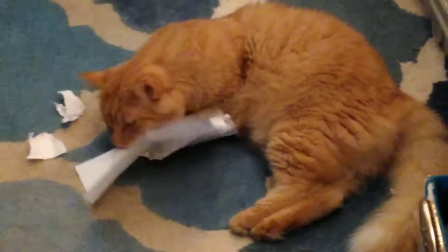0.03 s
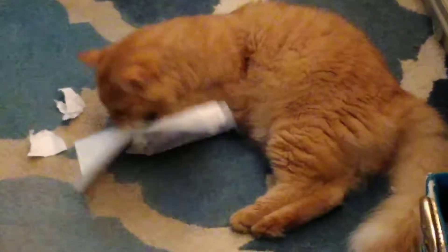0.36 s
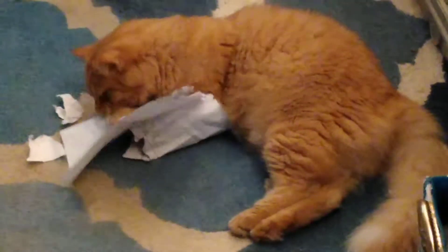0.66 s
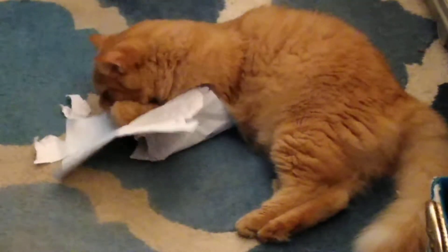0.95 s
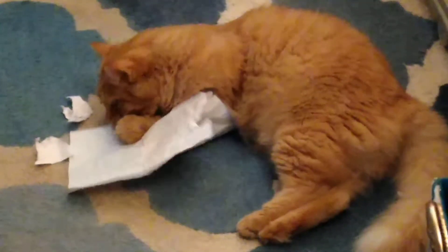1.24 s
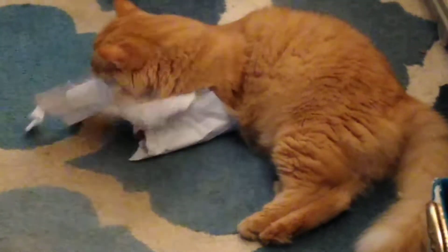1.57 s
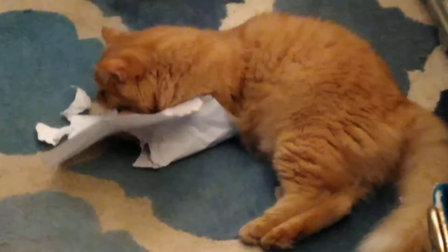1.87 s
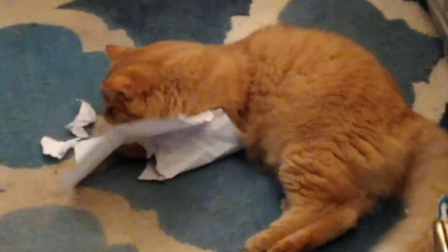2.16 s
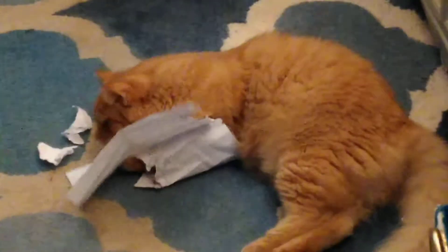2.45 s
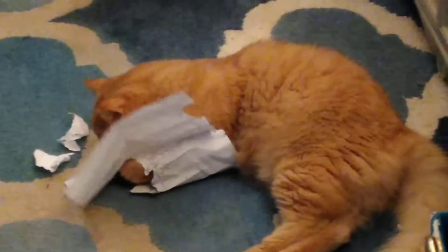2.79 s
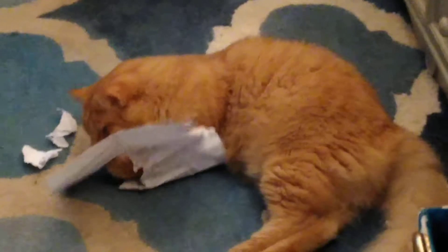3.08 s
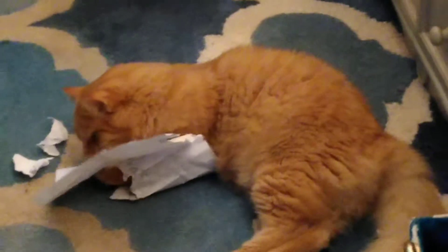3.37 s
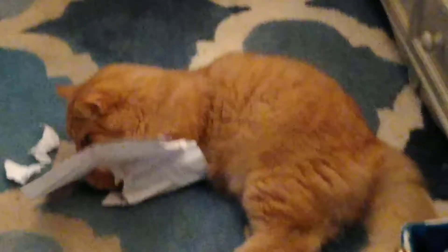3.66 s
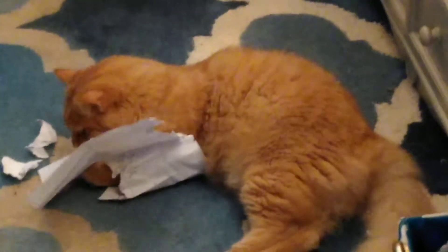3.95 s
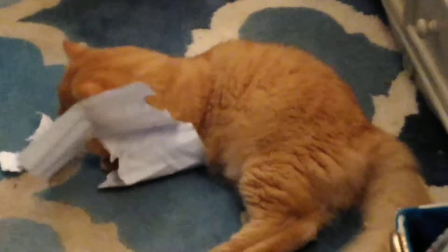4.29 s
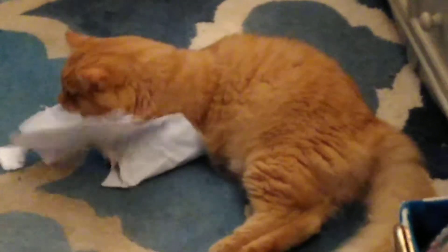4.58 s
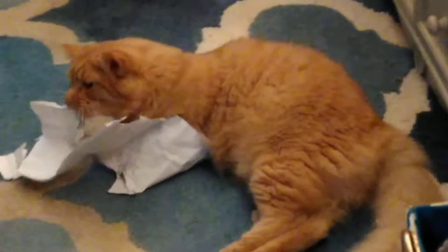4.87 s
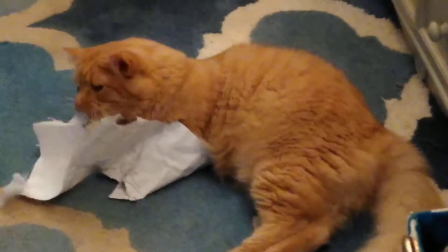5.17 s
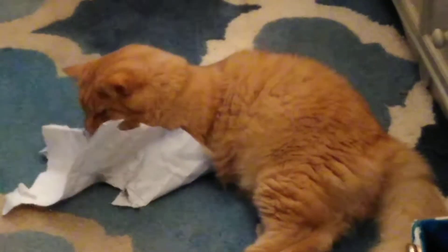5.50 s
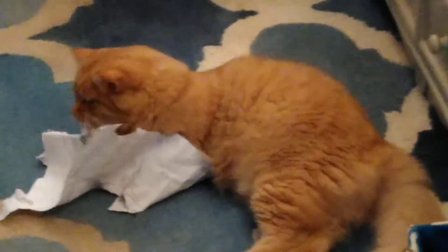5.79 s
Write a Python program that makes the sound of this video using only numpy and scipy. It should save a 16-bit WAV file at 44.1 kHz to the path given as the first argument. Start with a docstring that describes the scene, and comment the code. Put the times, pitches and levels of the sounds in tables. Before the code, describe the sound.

A cat tugs at a sheet of paper in a small, quiet room with faint air noise and a low hum. Soft rustling starts around 0.3 seconds, with a sharp crease snap at 0.7 and smaller crackles just after. The strongest flurry of crisp rustles and snaps runs from 1.4 to 1.8 seconds, followed by another snap near 2. Faint sliding lasts until about 2.6, then a lull, with one dull paper tick at 3.2. From 3.4 to 3.7 seconds the hand holding the phone makes close, muffled knocks and a small scuff, mostly on the left. The paper rustles again from 4.6 to 5 seconds. The loudest sound, a sharp handling pop, comes on the right just before 5.2, with a smaller one at 5.3, a cluster of knocks on the left at 5.6 and a last bump near 6, as a low grip rumble grows.

```python
"""A cat dragging paper

In a small, quiet room a cat on a rug bites and drags a sheet of paper. The sheet rustles with
each tug, rings as it slides and snaps where a crease flips over. The hand holding the phone
shifts: the grip rumbles, a fingertip scuffs and the case pops beside one of the two microphones.
The phone widens its stereo by subtracting a delayed copy of each mic from the other."""
import sys
import numpy as np
from scipy import signal
from scipy.fft import rfft, irfft, next_fast_len
from scipy.io import wavfile
from scipy.ndimage import uniform_filter1d, map_coordinates

SR = 44100
rng = np.random.default_rng(int(sys.argv[2]) if len(sys.argv) > 2 else 0)


def bounce(signal):
    """Save signal as a 16-bit WAV file at the path given by the first command-line argument."""
    frames = np.transpose(np.atleast_2d(signal))
    limited = np.clip(frames, -1, 1)
    pcm = np.round(limited * 32767).astype(np.int16)
    wavfile.write(sys.argv[1], SR, pcm)


N = 266210

# Tone colours, as lists of f/Hz, relative level/dB
AIR_SPECTRUM = [(20, -24), (65, 2), (110, 4), (150, -3.5), (220, 3.5), (290, -2.5), (420, -6.5), (520, -10),
                (1000, -17.5), (2200, -24), (5000, -22.5), (10000, -27), (14500, -33)]  # the room's air
HAND_SPECTRUM = [(20, 2), (40, -22), (65, 12.5), (84, 2.5), (110, -13), (135, 0), (200, 0.5), (330, -1),
                 (500, -18.5), (1000, -24.5), (3000, -42)]  # the rumbling grip
SKIN_SPECTRUM = [(100, -2), (450, 3.5), (1100, -5.5), (2000, -11), (3500, -18.5), (7000, -25), (14000, -30)]  # a slipping fingertip
FIBRE_SPECTRUM = [(500, -15), (1200, -5.5), (1850, -1.5), (2400, -1), (3000, 2.5), (4400, 3.5),
                  (5300, -1.5), (6400, 5), (7400, -1.5), (9000, -3), (12000, -9.5), (14500, -27)]  # hissing paper fibres
SHEET_SPECTRUM = [(100, -16), (280, 7.5), (480, 8.5), (580, 4), (700, 4), (900, 0.5), (1100, -8.5),
                  (1450, -4), (1900, -5.5), (2500, -70), (4000, -30)]  # the whole sheet flexing
# How long the room's echo lasts: f/Hz, time to fade by 60 dB/s
ROOM_DECAY = [(200, 0.052), (2000, 0.077), (12000, 0.14)]
# The hand's rumble as its grip changes: t/s, level/dB
GRIP_LEVELS = [(0.0, -76), (0.45, -74.5), (1.14, -69), (1.28, -71.5), (2.02, -69.5), (2.17, -73),
               (2.86, -73.5), (3.01, -71.5), (3.5, -63), (3.83, -68.5), (4.15, -67), (4.52, -65.5),
               (4.84, -59), (4.98, -64), (5.14, -64), (5.43, -62), (5.88, -54), (6.04, -53)]
# A fingertip scuffing the case: t/s, length/s, level/dB, side (0 left, 1 right)
FINGER_SCUFFS = [(3.612, 0.032, -48, .2), (3.725, 0.0025, -14, .2), (5.609, 0.01, -47.5, .1),
                 (5.622, 0.053, -47.5, 0.18), (5.915, 0.073, -53.5, 0.95)]
# Pops of the case: t/s, level/dB, edge sharpness/Hz, muffling/Hz, bass cut/Hz, ring amount,
# ring pitch/Hz, crack against push/dB, rebound (0-1), side (0 left, 1 right)
CASE_POPS = [(1.135, -47, 560, 1500, 180, 1.3, 265, -20, 0, .1),
             (2.0034, -38, 110, 1500, 44, .1, 265, -35, 0, 1),
             (3.357, -36, 730, 1800, 65, 2.4, 265, -9, 0.2, .09),
             (3.3861, -20, 534, 990, 390, 1.5, 220, -12, 0, 0.068),
             (3.473, -27, 526, 960, 190, 0.28, 265, -32, 0.3, .096),
             (3.4757, -22.5, 286, 1050, 170, 0.4, 270, -31, 0.1, .085),
             (3.6072, -29, 1150, 3000, 100, 2.1, 265, 0, 0, 1),
             (3.608, -30, 450, 1190, 55, 1.2, 263, 6, 0, 0.099),
             (3.6165, -15.5, 577, 1040, 23, 1.3, 253, -6.5, .15, 0.053),
             (3.7253, -12.5, 820, 2970, 95, 1.54, 236, 11, 0.32, 0.097),
             (5.1587, -6, 1180, 3680, 110, 0.76, 357, -4.5, 0.11, 0.92),
             (5.3394, -17, 410, 2400, 290, 0.72, 587, -19, 0.27, 0.97),
             (5.6002, -10.5, 910, 3800, 14, 1.5, 266, -43, 0.05, 0.038),
             (5.6035, -17, 122, 2000, 10, .085, 265, -33, 0, 0.059),
             (5.6184, -20, 890, 1880, 67, .13, 265, -7, 0, 0.18),
             (5.6206, -19, 644, 1710, 78, 0.62, 740, -14, 0, .2),
             (5.64, -38, 795, 1700, 150, 0.57, 265, -12, 0, 0.18),
             (5.835, -33, 318, 1500, 79, 0.74, 265, -14, 0.2, 1),
             (5.899, -33.5, 596, 1600, 170, 0.98, 344, -5, 0, 0.69),
             (5.982, -19.5, 236, 1190, 130, 0.32, 270, -15.5, 0, 1)]
# A faint tick of the case: the same columns without t and side
CASE_TICK = (-44, 420, 1500, 170, -4.5, 246, -16, 0.5)
# Faint rustle between tugs: t/s, soft paper hiss/dB, low noise from the hand on the phone/dB
BACKGROUND_RUSTLE = [(0, -102, -72), (.5, -67, -67), (1.9, -67.5, -58.5), (2.2, -74, -61.5),
                     (2.85, -72.5, -71.5), (3.5, -66.5, -57), (4.4, -66.5, -59), (6.04, -67, -62)]
# Tugs on the sheet: fastest moment t/s, length/s, hiss/dB, flexing against hiss/dB, treble tilt/dB
SHEET_TUGS = [(0.312, 0.27, -61, -7, 1), (0.625, 0.21, -62.5, -17, 0), (0.686, 0.026, -53, -15, -12),
              (0.806, 0.033, -54.5, 4.5, -2), (0.882, 0.069, -52.5, -4, 5.5), (1.107, 0.11, -55, -21, -2),
              (1.392, 0.022, -59.5, -8, 5), (1.477, 0.036, -46.5, -1.5, -6), (1.546, 0.061, -34.5, -2, -2),
              (1.634, 0.036, -40, -1, 3.5), (1.674, 0.21, -60, 2, 1), (1.786, 0.064, -51.5, 0, 3),
              (1.974, 0.087, -51, -9, -1), (2.337, 0.15, -59.5, -3, 1), (2.478, 0.12, -63.5, 1.5, 3),
              (2.581, 0.057, -58.5, -5, -2), (3.219, 0.016, -59, 13, -14), (4.579, 0.056, -50.5, -1.5, 3.5),
              (4.68, 0.12, -50, -1.5, 5), (4.757, 0.063, -45, 0.5, 0), (4.862, 0.052, -42, 0.5, 4),
              (4.955, 0.039, -47.5, -6, 1.5)]
# Brief notes of the bent, sliding sheet: t/s, length/s, f/Hz, level/dB
SHEET_RINGS = [(1.475, 0.051, 6350, -52), (1.514, .018, 1570, -51), (1.545, .03, 4200, -38),
               (1.56, 0.05, 735, -41), (1.634, 0.028, 466, -51), (1.978, 0.045, 1220, -61.5),
               (3.22, 0.017, 610, -52.5), (4.66, 0.062, 6300, -50.5), (4.744, 0.046, 1510, -52.5),
               (4.765, 0.031, 7900, -48.5), (4.867, 0.024, 1670, -47.5), (4.868, 0.039, 5470, -47),
               (5.14, 0.013, 6300, -49)]
# Creases flipping over: t/s, level/dB, brightness/Hz
CREASE_SNAPS = [(0.676, -20, 3520), (0.69, -36, 3500), (0.7967, -33, 4000), (0.811, -29.5, 4000),
                (1.4611, -27.5, 7100), (1.475, -37, 4500), (1.507, -23, 2000), (1.544, -20.5, 4000),
                (1.575, -21, 5000), (1.633, -26.5, 5000), (1.646, -31, 5000), (1.954, -25.5, 5470),
                (3.2137, -31, 700), (4.7394, -24.5, 4470), (5.142, -27.5, 6000)]
# How much of each mic is subtracted from the other: f/Hz, share (0-1)
CROSSFEED_SHARE = [(100, 0.84), (1200, 0.84), (2050, 1), (2550, 1), (3500, 0.7), (4600, 0.41), (7000, 0.15),
                   (14000, 0.023)]

MIC_GAP_S = 1 / 2280  # time sound takes to travel from one mic to the other


def amp(db):
    """Turn decibels into a gain."""
    return 10 ** (np.asarray(db) / 20)


def unit(x):
    """Scale a sound to an average strength (rms) of 1."""
    return x / np.sqrt(np.mean(x ** 2) + 1e-20)


def along(points, hz):
    """Read between a table's points on a log frequency scale."""
    freqs, values = np.transpose(points)
    return np.interp(np.log(hz + 1), np.log(freqs + 1), values)


def curves(rows):
    """Turn each column after the time into one value per sample."""
    times, *columns = np.transpose(rows)
    return [np.interp(np.arange(N) / SR, times, column) for column in columns]


def wobble(rate):
    """A smooth curve through `rate` random points a second."""
    return map_coordinates(rng.standard_normal(int(N * rate / SR) + 4), [np.arange(N) * rate / SR])


def swell(s, length, rise=0.4, steepness=1.34):
    """The power of one slide: it climbs quickly to 1 at time s, then falls more slowly."""
    t = np.arange(N) / SR
    away = np.maximum((s - t) / rise, (t - s) / (1 - rise)) / length
    return np.exp(-2 * np.minimum(away, 10) ** steepness)


def filtered(x, response):
    """Change each frequency's strength and timing by response(hz)."""
    n = x.shape[-1]
    padded = next_fast_len(n + SR // 4)
    return irfft(rfft(x, padded) * response(np.fft.rfftfreq(padded, 1 / SR)), padded)[..., :n]


def delay(hz, s):
    """The response that makes a sound s seconds late."""
    return np.exp(-2j * np.pi * hz * s)


def coloured(x, spectrum):
    """Give a sound a tone colour, at strength 1."""
    return unit(filtered(x, lambda hz: amp(along(spectrum, hz))))


def narrow(x, hz, half_width_hz):
    """Keep a narrow band around one pitch, at strength 1."""
    return unit(filtered(x, lambda f: 1 / (1 + ((f - hz) / half_width_hz) ** 2)))


def add(track, s, sound):
    """Mix a sound into a track at time s."""
    part = track[..., round(s * SR):][..., :sound.shape[-1]]
    part += sound[..., :part.shape[-1]]


def slips(rate, spread_db, smooth):
    """Rubbing: about `rate` tiny, uneven slips a second on top of smooth noise."""
    sizes = rng.standard_normal(N) * amp(spread_db * rng.standard_normal(N))
    return unit(sizes * (rng.random(N) < rate / SR)) + smooth * rng.standard_normal(N)


def mic_gains(side):
    """How strongly a touch on the case reaches the left and right mics."""
    return np.array([[1 - side], [side]]) / np.hypot(1 - side, side)


def diffuse(pair):
    """Sound from all around: only long waves are alike at both mics."""
    signs = np.array([[1], [-1]])
    mid, side = filtered(pair, lambda hz: np.sqrt((1 + signs * np.sinc(2 * hz * MIC_GAP_S)) / 2))
    return np.array([mid + side, mid - side])


def wall_echo(x, size=8192):
    """The short echo changes as the sheet moves, so each stretch of sound gets its own tail."""
    out, window = np.zeros((2, N)), signal.get_window("hann", size)
    for start in range(0, N - size, size // 2):
        hz, t, noise = signal.stft(rng.standard_normal((2, SR // 5)), SR, nperseg=256)
        fade = amp(-60 * t / along(ROOM_DECAY, hz)[:, None])
        tail = signal.istft(noise * fade, SR, nperseg=256)[1]
        stretch = window * x[start:start + size]
        add(out, start / SR, signal.fftconvolve(stretch[None], tail / np.linalg.norm(tail[0]), axes=1))
    return diffuse(out)


def in_room(x, direct_db, echo_db, shade_db, left_lag_s=.00004):
    """Sound reaches the right mic first, then echoes; the phone's shade tips the treble to the right."""
    direct = np.array([filtered(x, lambda hz: delay(hz, left_lag_s)), x])
    shade = lambda hz: amp(np.array([[-1], [1]]) * shade_db * hz / (hz + 2500))
    return filtered(amp(direct_db) * direct + amp(echo_db) * wall_echo(x), shade)


def room_tone(air_db=-56.0, hum_db=-63.5, hum_hz=354):
    """Quiet air with a wavering hum."""
    air = amp(air_db) * coloured(diffuse(rng.standard_normal((2, N))), AIR_SPECTRUM)
    return air + amp(hum_db) * narrow(rng.standard_normal(N), hum_hz, half_width_hz=9)


def grip_rumble(left_db=2, right_db=-12.5, drone_hz=102):
    """The hand creeps on the case: a rumble with a low drone, stronger at the left mic."""
    level_db = curves(GRIP_LEVELS)[0] + 14  # the stereo widening cancels much of this
    shudder = slips(rate=300, spread_db=-1, smooth=1) + 0.39 * rng.standard_normal((2, N))
    tremor_db = 1.5 * wobble(14)
    rumble = amp(tremor_db - 4) * coloured(shudder, HAND_SPECTRUM)
    drone_db = -4 + 0.41 * (level_db + 55)  # stands out more as the grip tightens
    drone = amp(drone_db) * narrow(shudder, drone_hz, half_width_hz=16)
    return amp(level_db) * amp([[left_db], [right_db]]) * (rumble + drone)


def finger_scuffs():
    """A fingertip slips on the case with a short, dull crunch."""
    grit = coloured(slips(rate=1800, spread_db=7.5, smooth=.4), SKIN_SPECTRUM)
    return grit * sum(amp(db) * np.sqrt(swell(s, length)) * mic_gains(side)
                      for s, length, db, side in FINGER_SCUFFS)


def case_ticks(count=7, spread_db=8):
    """Rows for faint extra pops at random moments, likelier while the grip is tight."""
    effort = np.cumsum(amp(curves(GRIP_LEVELS)[0]))
    db, *tone = CASE_TICK
    return [(np.searchsorted(effort, when * effort[-1]) / SR, db + spread_db * (2 * force - 1), *tone, side)
            for when, force, side in rng.random((count, 3))]


def case_push(t, edge_hz, muffle_hz, bass_hz, ring, ring_hz, hole_hz=100, width_hz=90):
    """One push makes the case thump and ring briefly, muffled by the soft fingertip."""
    def response(hz):
        rounded = 1 / ((1 + 1j * hz / edge_hz) * (1 + 1j * hz / edge_hz - (hz / edge_hz) ** 2))
        released = 1j * hz / (bass_hz + 1j * hz)  # letting go quickly thins the bass
        mic_hole = hz ** 2 / (hole_hz ** 2 - hz ** 2 + 1j * hz * width_hz)  # slow pressure leaks away
        ringing = 1j * hz * width_hz / (ring_hz ** 2 - hz ** 2 + 1j * hz * width_hz)
        return rounded * released * mic_hole * (1 + ring * ringing)
    fingertip = signal.butter(4, muffle_hz, fs=SR, output="sos")
    push = signal.sosfilt(fingertip, filtered(1. * (t == 0), response))
    return push / np.abs(push).max()


def case_crack(t, top_hz, decay_s=.003):
    """The sharp edge of a pop: a click with a trace of noise."""
    burst = (t == 0) + .05 * rng.standard_normal(len(t)) * amp(-60 * t / decay_s)
    crack = filtered(burst, lambda hz: 1j * hz / (1400 + 1j * hz) / (1 + 1j * hz / top_hz) ** 2)
    return crack / np.linalg.norm(crack)


def case_pops(rebound_s=0.00181, far_hz=350, air_leak_db=-13, widening_db=-9):
    """Each pop is a push and a crack; the case may then spring back with a duller copy."""
    out, t = np.zeros((2, N)), np.arange(SR // 16) / SR
    for row in CASE_POPS + case_ticks():
        s, db, edge_hz, muffle_hz, bass_hz, ring, ring_hz, crack_db, rebound, side = row
        push = case_push(t, edge_hz, muffle_hz, bass_hz, ring, ring_hz)
        crack = amp(crack_db) * case_crack(t, top_hz=1.5 * muffle_hz)
        spring_back = lambda hz: 1 - rebound * delay(hz, rebound_s) / (1 + (hz / 1800) ** 2)
        pop = filtered(push + crack, spring_back)
        gains = mic_gains(side)
        # The far mic gets the dull part of the pop, plus a little of the crack through the air.
        # For left-side pops the stereo widening puts a stronger, late, upside-down crack there instead.
        through_case = lambda hz: gains / (1 + 1j * hz * (gains.max() - gains) / far_hz)
        leak = lambda hz: -amp(widening_db) * delay(hz, MIC_GAP_S) if side < .5 else amp(air_leak_db)
        far_crack = (gains < gains.max()) * filtered(crack, leak)
        add(out, s, amp(db) * (filtered(pop, through_case) + far_crack))
    return out


def crease_snaps(decay_s=0.004, splinter=.15):
    """A crease flips over with one sharp crack and a few splintering fibres."""
    out, t = np.zeros(N), np.arange(SR // 20) / SR
    for s, db, bright_hz in CREASE_SNAPS:
        splinters = splinter * rng.standard_normal(len(t)) * amp(-60 * t / decay_s)
        burst = coloured((t == 0) + splinters, FIBRE_SPECTRUM)
        crack = filtered(burst, lambda hz: 1j * hz / (bright_hz + 1j * hz) ** 2)
        add(out, s, amp(db) * crack / np.abs(crack).max())
    return out


def paper_rings():
    """Rubbing makes the sheet ring at whichever pitch its bend favours."""
    friction = slips(rate=2000, spread_db=6, smooth=0.72)
    return sum(amp(db) * np.sqrt(swell(s, length)) * narrow(friction, hz, half_width_hz=0.066 * hz)
               for s, length, hz, db in SHEET_RINGS)


def cat_tugs():
    """Each tug swells above the faint background: gives hiss, low tones and treble tilt in dB."""
    hiss, low = amp(curves(BACKGROUND_RUSTLE)) ** 2
    tilt = np.zeros(N)
    for s, length, db, flex_db, tilt_db in SHEET_TUGS:
        power = amp(db) ** 2 * swell(s, length)
        hiss += power
        low += power * amp(flex_db) ** 2
        tilt += power * tilt_db
    return 10 * np.log10(hiss), 10 * np.log10(low), tilt / hiss


def sheet_bending(x, depth_db=2.5):
    """As the sheet bends, patches of its tone grow louder and softer."""
    bands = signal.stft(x, nperseg=512)[2]
    patches = uniform_filter1d(rng.standard_normal(bands.shape), size=7, axis=0)  # blur over pitch
    patches = uniform_filter1d(patches, size=6, axis=1)  # blur over time
    return unit(signal.istft(bands * amp(depth_db * unit(patches)), nperseg=512)[1][:N])


def paper_rustle(split_hz=4600):
    """Fibres hiss, brighter when an edge scrapes; the flexing sheet and the hand add low tones."""
    hiss_db, low_db, tilt_db = cat_tugs()
    catch_db = 1.3 * wobble(160)  # the sheet catches and lets go
    fibres = sheet_bending(coloured(slips(rate=3000, spread_db=5.8, smooth=0.62), FIBRE_SPECTRUM))
    dull = filtered(fibres, lambda hz: 1 / (1 + (hz / split_hz) ** 6))
    bright = fibres - dull
    hiss = amp(hiss_db + catch_db) * (dull * amp(-tilt_db / 2) + bright * amp(tilt_db / 2))
    low_tones = coloured(slips(rate=2000, spread_db=1.5, smooth=0.6), SHEET_SPECTRUM)
    return hiss + amp(low_db + catch_db - 1.5) * low_tones


def scene():
    """Everything that reaches the two mics."""
    sheet = in_room(paper_rustle() + paper_rings(), direct_db=-9, echo_db=-2, shade_db=4)
    snaps = in_room(crease_snaps(), direct_db=-8.5, echo_db=-3.5, shade_db=0)
    return sheet + snaps + case_pops() + finger_scuffs() + grip_rumble() + room_tone()


def record(dry, top_hz=14700):
    """The phone subtracts a delayed copy of each mic from the other, then cuts the highest treble."""
    crossfeed = lambda hz: np.clip(along(CROSSFEED_SHARE, hz), 0, .99) * delay(hz, MIC_GAP_S)
    widened = dry - filtered(dry[::-1], crossfeed)
    return filtered(widened, lambda hz: 1 / np.sqrt(1 + (hz / top_hz) ** 120))


dry = scene()
out = record(dry)
bounce(out)
```